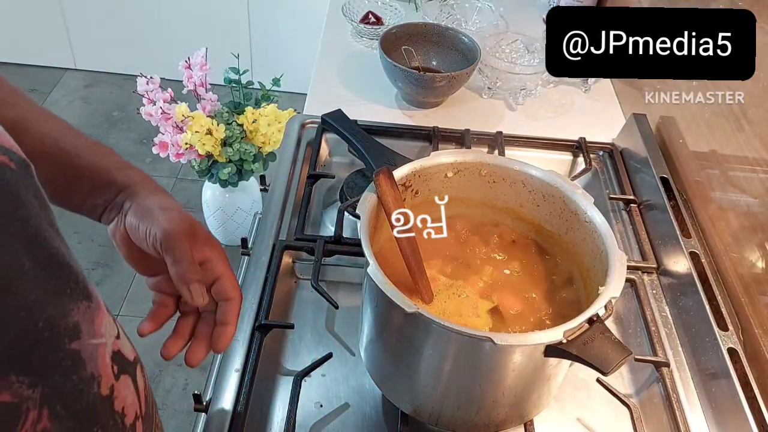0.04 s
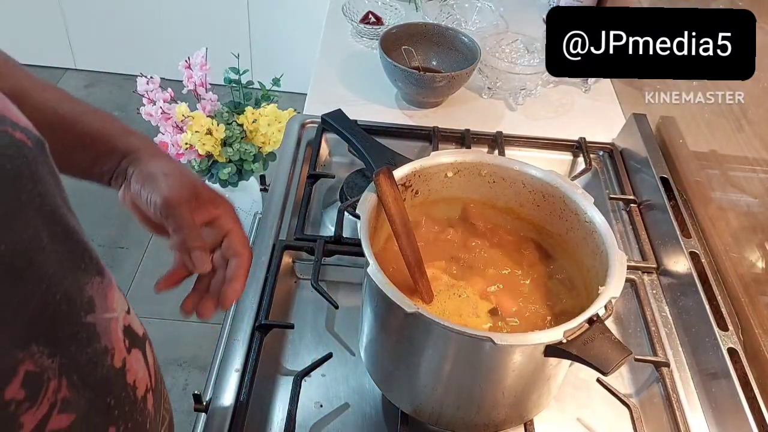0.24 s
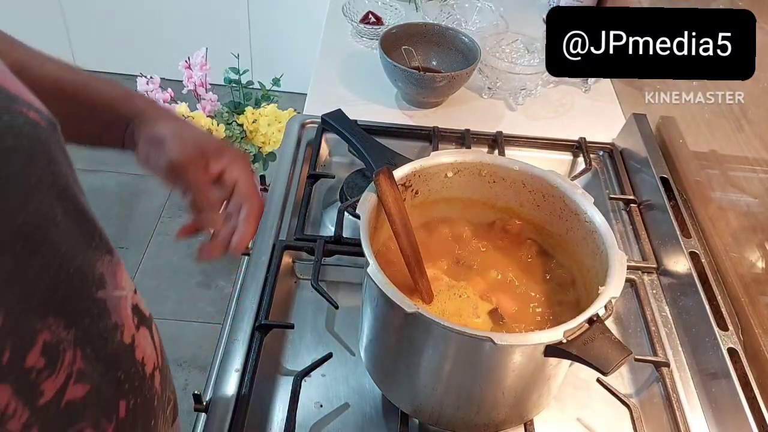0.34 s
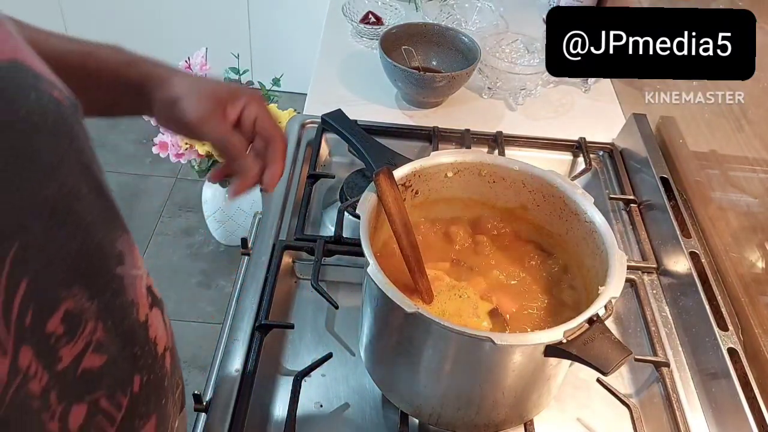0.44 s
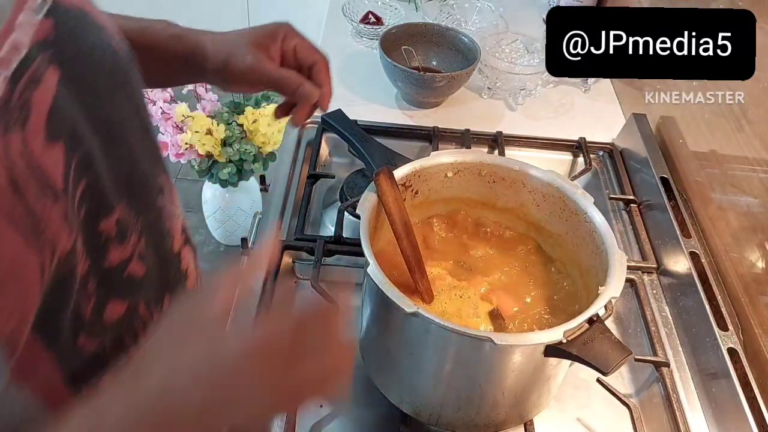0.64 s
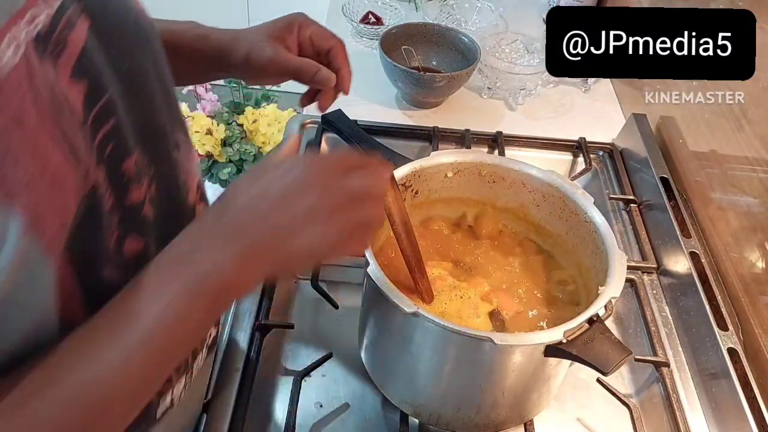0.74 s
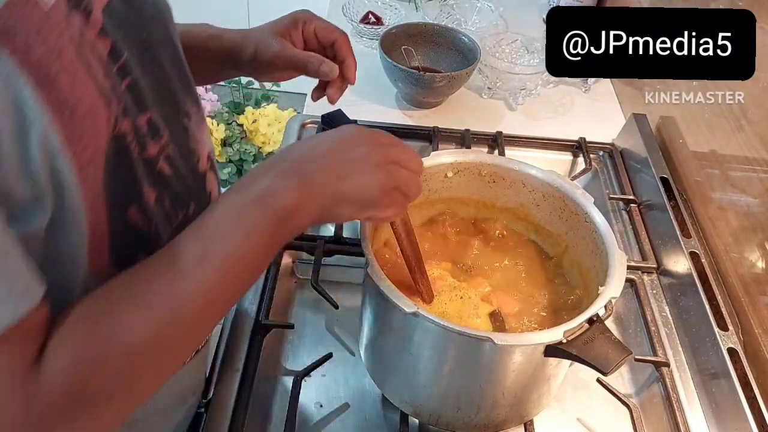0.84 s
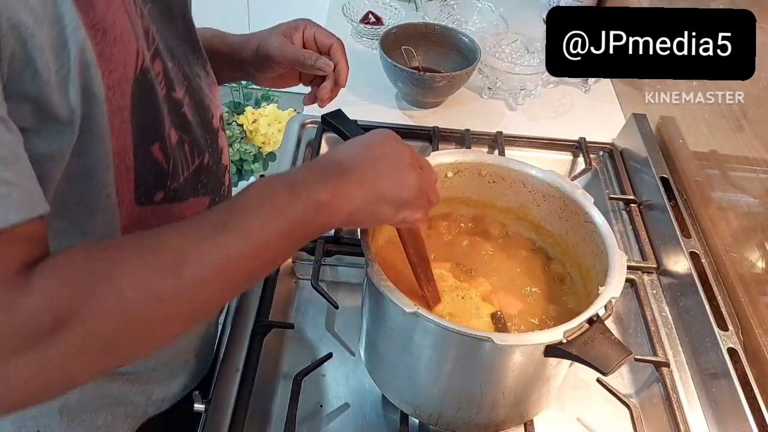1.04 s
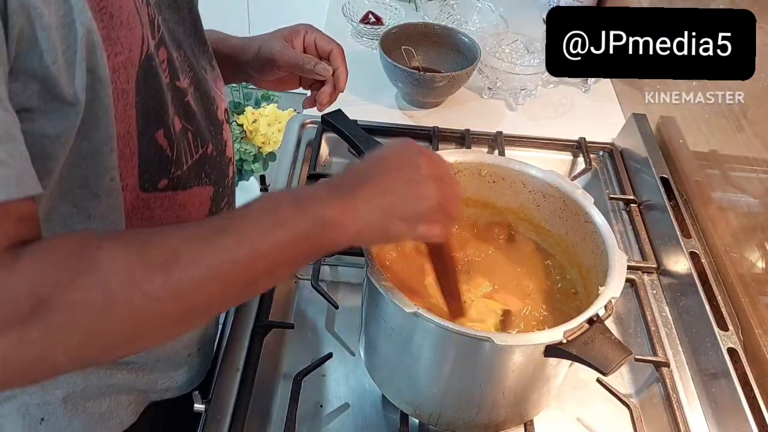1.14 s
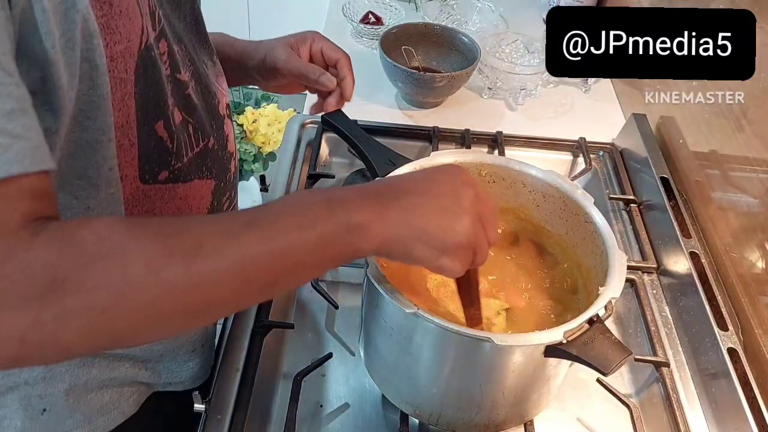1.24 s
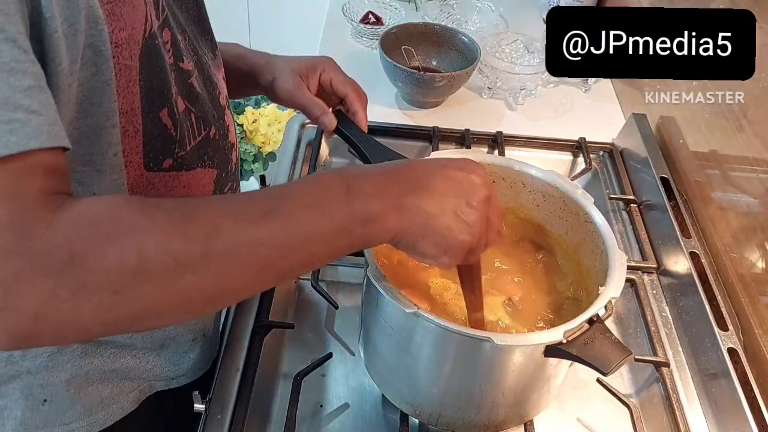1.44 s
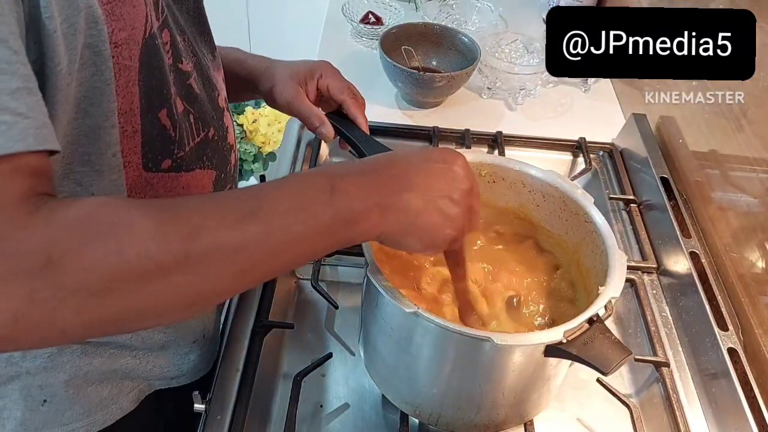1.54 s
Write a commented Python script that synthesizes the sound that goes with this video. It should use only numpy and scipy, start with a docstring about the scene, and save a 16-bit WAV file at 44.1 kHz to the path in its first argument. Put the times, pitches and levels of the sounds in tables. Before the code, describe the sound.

Close by, heavy sauce simmers with low wet plops over faint burner rush and hiss. A hard wooden double knock bursts in and rings through the room, then bubbling resumes with one short stir and sizzle.

```python
"""In a kitchen, thick curry simmers in an open metal pot: bubbles plop as gliding tones, and skins of
sauce pop as short noise bursts. Out of sight something heavy and wooden, perhaps a door, knocks twice
and rattles: decaying modes and cracks excite a hard-walled room. Then a wooden spoon pushes through the
curry, and sauce sizzles briefly on the hot wall: noise bands that swell and decay.
Under it all lie the burner's low rush, a flickering treble hiss and a fine seething, all shaped noise."""
import sys
import numpy as np
from scipy import signal
from scipy.fft import rfft, irfft
from scipy.io import wavfile
from scipy.ndimage import uniform_filter1d, minimum_filter1d

SR = 44100
rng = np.random.default_rng(int(sys.argv[2]) if len(sys.argv) > 2 else 0)


def master_out(mix):
    """Clip the mix to full scale and print it as 16-bit PCM to the path in sys.argv[1]."""
    frames = np.transpose(np.atleast_2d(mix))
    ceiling = np.clip(frames, -1, 1)
    pcm = np.round(ceiling * 32767).astype(np.int16)
    wavfile.write(sys.argv[1], SR, pcm)


N = 70560


def undb(db):
    """Level law: decibels to amplitude ratio."""
    return 10 ** (np.asarray(db) / 20)


def unit(x):
    """Normalisation to a root-mean-square of 1."""
    return x / np.sqrt(np.mean(x ** 2) + 1e-20)


def clock():
    """Sampling: the time of every sample in seconds."""
    return np.arange(N) / SR


def add(out, start_s, x):
    """Superposition: mix x into out from a start time."""
    first = int(np.clip(round(start_s * SR), 0, N - 1))
    out[first:first + len(x)] += x[:N - first]


def through(x, response):
    """Linear system: convolve a source with an impulse response."""
    return signal.fftconvolve(x, response)[:N]


def colour(x, points):
    """Minimum-phase filter through (Hz, dB) points, of unit power gain."""
    hz, db = np.array(points, float).T[:2]
    freqs = np.arange(N + 1) * SR / (2 * N)
    gain = unit(undb(np.interp(np.log(freqs + 1), np.log(hz), db)))
    # folding the cepstrum onto positive times makes the filter causal
    cepstrum = irfft(np.log(gain))
    cepstrum[1:N] *= 2
    cepstrum[N + 1:] = 0
    response = np.exp(rfft(cepstrum))
    return irfft(rfft(x, 2 * N) * response)[:N]


def noise(points):
    """Spectral shaping: white noise coloured and scaled to rms 1."""
    return unit(colour(rng.standard_normal(N), points))


def fade(t, t60):
    """Exponential decay, 60 dB in t60 seconds."""
    return np.exp(-np.log(1000) * t / t60)


def ring(modes):
    """Modal sum: damped sines whose starting directions alternate from mode to mode."""
    t = clock()[:N // 4]
    response = np.zeros(len(t))
    for k, (hz, db, t60) in enumerate(modes):
        response += (-1) ** k * undb(db) * np.sin(2 * np.pi * hz * t) * fade(t, t60)
    return response


def band(x, lo_hz, hi_hz, order=2):
    """Butterworth band-pass filter."""
    edges = [lo_hz, min(hi_hz, SR / 2 - 1)]
    return signal.sosfilt(signal.butter(order, edges, "band", fs=SR, output="sos"), x)


def low_pass(x, hz):
    """Second-order Butterworth low-pass filter."""
    return signal.sosfilt(signal.butter(2, hz, fs=SR, output="sos"), x)


def wander(seconds):
    """Smoothed random process of rms 1 that changes within the given time."""
    k = int(seconds * SR)
    return unit(uniform_filter1d(uniform_filter1d(rng.standard_normal(N), k), k))


def sparse(chance):
    """Random impulse train: each sample holds a grain with the given chance."""
    return rng.standard_normal(N) * (rng.random(N) < chance)


def surge(start, rise, fall_db, db):
    """Envelope: a linear rise in seconds to a level in dB, then a fall in dB per second."""
    t = clock() - start
    return np.clip(t / rise, 0, 1) * undb(db - fall_db * np.maximum(t - rise, 0))


def boiling():
    """Amplitude modulation: a gain that follows the briskness of the simmer."""
    # Briskness of the simmer. Each row: time in seconds, gain in dB.
    briskness = [(0, 11), (0.05, 3.5), (0.09, 9.5), (0.17, 4), (0.6, -4.5), (0.92, 4), (1.0, -7), (1.1, 4),
                 (1.35, 2.5), (1.6, -2)]
    return undb(np.interp(clock(), *np.array(briskness).T))


def stove():
    """Filtered noise: the low rush of the pot on the burner, and a fine crackling hiss that flickers."""
    # Spectrum of the low rush. Each row: frequency in Hz, relative level in dB.
    rush_colour = [(20, -24), (55, 2.5), (95, 9.5), (200, 4.5), (500, 6.5), (1200, -3.5), (2500, -13.5),
                   (5000, -23), (15000, -40)]
    # Spectrum of the treble hiss. Each row: frequency in Hz, relative level in dB.
    hiss_colour = [(1500, -6.5), (3600, -6.5), (4100, -3.5), (4350, -0.5), (4700, -3), (6800, -4.5),
                   (8000, -1), (8700, -2), (9500, -1), (12000, -3), (14500, -2)]
    # Course of the treble hiss. Each row: time in seconds, level in dB.
    hiss_level = [(0, -53.5), (0.18, -54.5), (0.249, -48.5), (0.32, -66), (0.42, -61.5), (0.53, -57),
                  (0.7, -58.5), (0.87, -57), (1.0, -62), (1.098, -51.5), (1.17, -55.5), (1.45, -55.5),
                  (1.6, -59.5)]
    rush = undb(-55) * noise(rush_colour) * boiling()

    crackles_per_s, crackle_spread_db, crackle_share = 250, 5, 0.435
    strength = np.minimum(rng.exponential(size=N), 5)
    crackles = sparse(crackles_per_s / SR) * undb(crackle_spread_db * strength)

    # each band flickers on its own and partly along with the others
    flicker_db, flicker_s = 2, 0.011
    shared = wander(flicker_s)
    steam = np.zeros(N)
    edges = np.linspace(500, 15500, 16)
    for lo, hi in zip(edges, edges[1:]):
        flicker = wander(flicker_s) + shared / 2
        steam += band(rng.standard_normal(N), lo, hi) * undb(flicker_db * flicker)
    hiss = unit(colour(unit(steam) + crackle_share * unit(crackles), hiss_colour))
    return rush + hiss * undb(np.interp(clock(), *np.array(hiss_level).T))


def froth():
    """Dense superposition: a crowd of tiny bubbles merges into a soft seething that comes and goes."""
    # Spectrum of the seething. Each row: frequency in Hz, relative level in dB.
    seethe_colour = [(500, -32.5), (850, -13), (1080, 1.5), (1400, 1), (1650, -4), (1900, -6),
                     (2400, -15.5), (3200, -34), (6000, -49)]
    # Course of the seething. Each row: time in seconds, level in dB.
    seethe_level = [(0, -48), (0.05, -58), (0.16, -57), (0.4, -43), (0.54, -36), (0.62, -42.5), (0.72, -41),
                    (0.86, -47), (0.98, -66.5), (1.6, -71)]
    seething = unit(colour(sparse(.06), seethe_colour))
    return seething * undb(np.interp(clock(), *np.array(seethe_level).T))


def bubble(hz, t60):
    """Bubble resonance: a pocket of gas swells into tone and rises a little as it dies."""
    rise_s, glide_per_s = .0024, 0.44
    t = clock()[:N // 8]
    swell = 1 - np.exp(-(t / rise_s) ** 2)
    shape = swell * fade(t, t60)
    # the phase integrates a pitch that climbs linearly
    return shape / shape.max() * np.sin(2 * np.pi * hz * t * (1 + glide_per_s * t / 2))


def plop(hz, t60):
    """Amplitude modulation: a large bubble in thick sauce flutters as its skin moves."""
    tone = bubble(hz, t60)
    return tone * (1 + 0.21 * wander(0.0031)[:len(tone)])


def pop(hz):
    """Impulsive release: a film of sauce tears in a short burst, heard in one band."""
    decay_s, width = 0.0021, 0.39
    t = clock()[:N // 32]
    burst = rng.standard_normal(len(t)) * np.exp(-t / decay_s)
    burst = band(burst, hz / (1 + width), hz * (1 + width), order=3)
    return burst / np.abs(burst).max()


def boil():
    """Source and resonator: plops, pops and small bubbles ring the air in the pot and the kitchen."""
    # Bursting skins of sauce. Each row: start in seconds, level in dB, centre frequency in Hz.
    skins = [(0.003, -29, 960), (0.124, -33.5, 1050), (0.172, -33, 930), (0.196, -28, 1350),
             (0.927, -30, 1240), (0.931, -43, 1180), (1.132, -27.5, 1700), (1.345, -39.5, 1400),
             (1.455, -39, 895), (1.475, -45, 1390), (1.539, -45, 1300), (1.569, -47, 1610)]
    # Large bubbles. Each row: start in seconds, level in dB, starting pitch in Hz, t60 in seconds.
    large_bubbles = [(0.013, -36.5, 1136, 0.11), (0.077, -30, 704, 0.017), (0.081, -27, 573, 0.068),
                     (0.108, -29.5, 620, 0.064), (0.122, -24.5, 658, 0.023), (0.140, -40, 1076, 0.061),
                     (0.602, -25, 650, 0.027), (0.840, -28.5, 548.4, .04), (0.851, -33, 503, .06),
                     (0.925, -35, 1117, 0.061), (1.033, -43.5, 536, .06), (1.083, -38, 504, .05),
                     (1.108, -43, 1085, 0.105), (1.0973, -26.5, 520, 0.042), (1.145, -30, 524, 0.064),
                     (1.170, -36.5, 510, 0.023), (1.344, -29.5, 566, 0.028), (1.398, -32, 612, 0.019),
                     (1.474, -31.5, 533, 0.0206), (1.486, -42, 522.4, 0.11), (1.503, -42.5, 514, .05),
                     (1.5425, -29, 614, 0.021), (1.581, -46, 520, 0.046), (1.595, -41, 514, .04)]
    # Air resonances of the pot. Each row: frequency in Hz, relative level in dB, t60 in seconds.
    air_modes = [(517, -0.5, 0.13), (632, -5.5, 0.046), (1120, -1, 0.17), (1250, -6, .06)]
    t, out = clock(), np.zeros(N)
    for start, db, hz in skins:
        add(out, start, undb(db) * pop(hz))
    for start, db, hz, t60 in large_bubbles:
        add(out, start, undb(db) * plop(hz, t60))

    simmer = np.zeros(N)
    simmer_per_s, simmer_db, spread_db = 110, -48, 1.5
    for when, height, strength in rng.random((int(simmer_per_s * N / SR), 3)):
        # the higher its pitch, the softer the bubble
        db = simmer_db + spread_db * (2 * strength - 1) - 7 * height
        add(simmer, when * N / SR, undb(db) * bubble(440 * 3.38 ** height, 0.042))
    out += simmer * boiling()

    kitchen = band(rng.standard_normal(N), 178, 5500)
    kitchen *= np.exp(-t / .024) * (1 - np.exp(-t / 0.0021))
    kitchen /= np.linalg.norm(kitchen)
    in_pot = undb(-54) * through(out, ring(air_modes))
    in_kitchen = undb(-11) * through(out, kitchen)
    return out + in_pot + in_kitchen


def shudder():
    """Repeated impact: dense small contacts swell into the first knock and chatter away after it."""
    # Spectrum of the chatter. Each row: frequency in Hz, relative level in dB.
    chatter_colour = [(28, -34), (52, -9), (90, -15.5), (200, -16), (330, -7), (520, -1.5), (800, 2),
                      (1050, -1.5), (1400, 0.5), (1900, -7.5), (2500, -15), (3100, -26.5), (4200, -31.5),
                      (7000, -44), (14000, -60)]
    contacts_per_s = 9000
    chatter = unit(colour(sparse(contacts_per_s / SR), chatter_colour))
    return chatter * surge(0.2, rise=0.009, fall_db=65, db=-19)


def hall():
    """Reverberation: early reflections, then a diffuse tail whose decay depends on frequency."""
    # The room's answer. Each row: frequency in Hz, relative level in dB, t60 in seconds.
    room = [(28, -26, 0.54), (52.5, -1, 0.47), (69.7, -8.5, 0.66), (100, -5, 0.62), (168, -15.5, 0.63),
            (303, -5.5, 0.65), (497, 0, 0.74), (736, -8, 0.97), (1060, -0.5, 0.99), (1318, 1, 1.04),
            (2055, -8.5, 1.06), (2630, -18.5, 0.86), (3520, -37.5, 0.47), (6000, -37.5, 0.57),
            (14000, -50.5, 0.36)]
    late_db, early_db, early_s, build_s = -31.5, -22.5, .024, .014
    t = clock()
    hz, _, t60 = np.array(room).T
    late = np.zeros(N)
    edges = np.geomspace(20, 20000, 16)
    for lo, hi in zip(edges, edges[1:]):
        band_t60 = np.interp(np.log(lo * hi) / 2, np.log(hz), t60)
        late += band(rng.standard_normal(N), lo, hi, order=3) * fade(t, band_t60)
    early = rng.standard_normal(N) * np.exp(-t / early_s)
    reflections = undb(late_db) * late + undb(early_db) * early
    return colour(reflections * (1 - np.exp(-t / build_s)), room)


def knocks():
    """Impact excitation: each contact cracks and rings the wood's modes, and the room answers."""
    # Contacts of the knocks. Each row: start in seconds, relative level in dB, low-pass corner in Hz.
    contacts = [(0.2089, 3, 3350), (0.2127, -10.5, 555), (0.2625, -4, 2820), (0.2669, -10.5, 2140),
                (0.2847, -8.5, 2224), (0.338, -17.5, 2200), (0.3964, 2.5, 3100), (0.3985, -5, 1370),
                (0.4053, 1.5, 3130), (0.41, -2.5, 746), (0.4162, -7, 2210)]
    # Modes of the knocked wood. Each row: frequency in Hz, relative level in dB, t60 in seconds.
    wood_modes = [(320.7, -22.5, 0.26), (470.6, -11, .16), (573, -4, 0.077), (654.6, -7, 0.093),
                  (734, -2.5, 0.0517), (881, -3.5, 0.038), (948, -5.5, 0.025), (1105, -5.5, 0.079),
                  (1278, -3, 0.034), (1351, -5.5, 0.077), (1412, -5, 0.055), (1710, -4.5, 0.018),
                  (2010, -16, 0.1), (2370, -13, 0.019)]
    # Spectrum of the crack. Each row: frequency in Hz, relative level in dB.
    crack_colour = [(25, -47), (60, -17.5), (150, -12.5), (300, -11), (550, 2.5), (1400, 1), (2000, -6.5),
                    (2700, -15), (3600, -30.5), (6000, -52), (15000, -62.5)]
    wood_db, crack_db, crack_s = -10.5, -10, 0.0041
    t, out, wood = clock(), np.zeros(N), np.zeros(N)
    add(wood, 0, undb(wood_db) * ring(wood_modes))
    for start, db, corner_hz in contacts:
        burst = rng.standard_normal(N) * np.exp(-t / crack_s)
        crack = undb(crack_db) * colour(burst, crack_colour)
        blow = low_pass(wood + crack, corner_hz)
        add(out, start, undb(db) * (blow + hall()))
    return out


def stir():
    """Impact and friction: the spoon bumps the pot and pushes sauce, which spits and sizzles on the wall."""
    # Spectrum of the wet slosh. Each row: frequency in Hz, relative level in dB.
    slosh_colour = [(30, -35), (100, -21), (280, 0.5), (390, -12), (550, -3), (790, 1.5), (950, -7),
                    (1220, -6), (1550, -0.5), (1950, -3), (2200, -12.5), (2750, -2), (3200, -25.5),
                    (4300, -47)]
    # Spectrum of the first spit. Each row: frequency in Hz, relative level in dB.
    spit_colour = [(3000, -41), (4800, -28), (5400, -4), (6800, -10.5), (7950, 2.5), (9000, -10),
                   (15000, -34)]
    # Spectrum of the sizzle. Each row: frequency in Hz, relative level in dB.
    sizzle_colour = [(1000, -35), (4600, -34), (5400, -5), (8500, -3), (12000, 4.5), (14500, -6.5)]
    stroke_s = 1.179
    t = clock()
    slosh = unit(colour(sparse(.15), slosh_colour))
    out = slosh * surge(stroke_s, rise=0.026, fall_db=136, db=-32)
    out += noise(spit_colour) * surge(stroke_s, rise=0.026, fall_db=160, db=-41.5)
    out += noise(sizzle_colour) * surge(stroke_s, rise=0.13, fall_db=105, db=-39.5)

    bump = noise([(60, -10), (250, -1), (800, -6), (2500, -6), (4000, -40)])
    add(out, stroke_s, undb(-27) * bump * np.exp(-t / .004))
    thud = np.sin(2 * np.pi * 63.4 * t) * fade(t, 0.23)
    add(out, stroke_s, undb(-45.5) * thud)
    return out


def scene():
    """Mid-side stereo: all sources sit in the middle, with a trace of width from a nearby wall."""
    mid = stove() + froth() + boil() + shudder() + knocks() + stir()
    side = np.zeros(N)
    add(side, .007, undb(-45.5) * mid)
    return np.array([mid + side, mid - side])


def record(dry):
    """Peak limiting and low-pass: gain eases down around peaks above the limit, and the top is cut."""
    limit_db, limit_s, top_hz = 0.63, .004, 14700
    size = int(limit_s * SR)
    gain = np.minimum(1, undb(limit_db) / (np.abs(dry).max(axis=0) + 1e-9))
    # hold the lowest gain around each peak, then smooth it
    gain = minimum_filter1d(gain, 2 * size + 1)
    gain = uniform_filter1d(uniform_filter1d(gain, size), size)
    return signal.sosfilt(signal.ellip(10, .2, 80, top_hz, fs=SR, output="sos"), dry * gain)


dry = scene()
out = record(dry)
master_out(out)
```